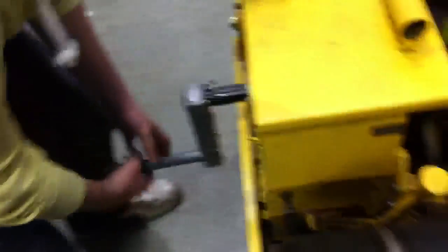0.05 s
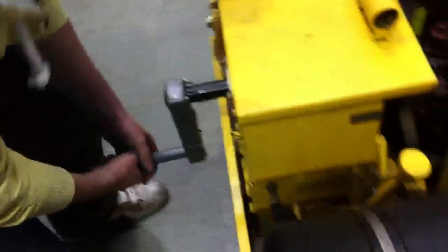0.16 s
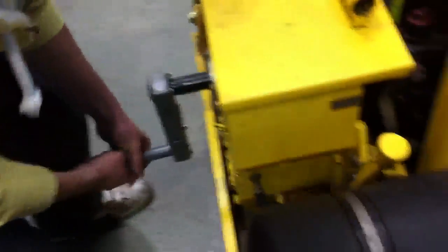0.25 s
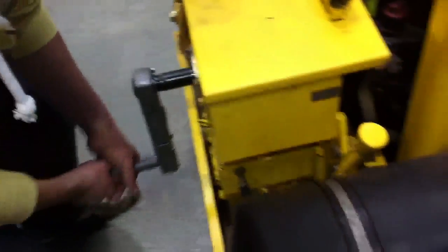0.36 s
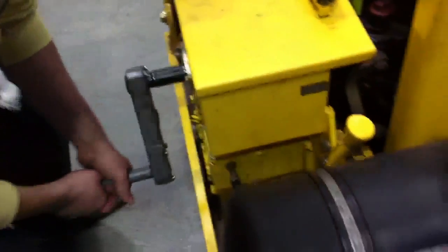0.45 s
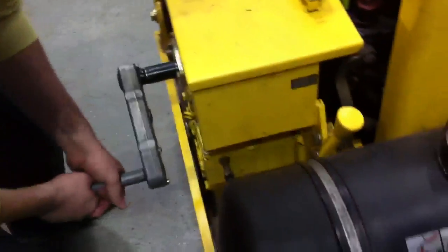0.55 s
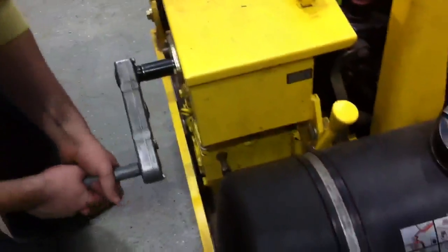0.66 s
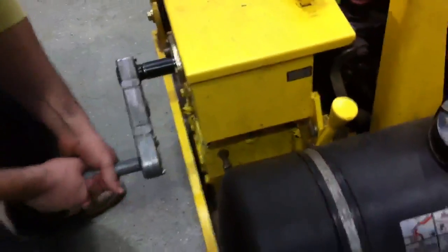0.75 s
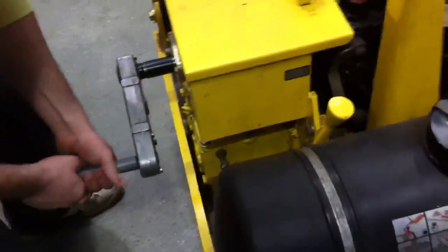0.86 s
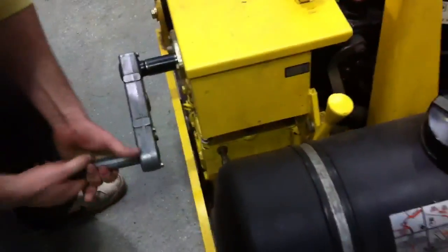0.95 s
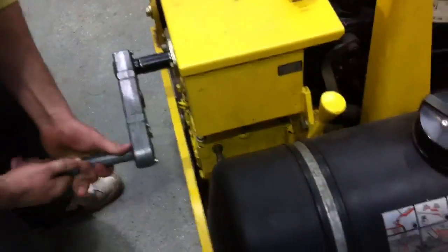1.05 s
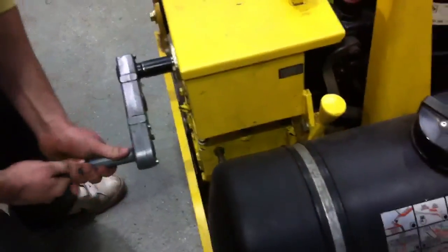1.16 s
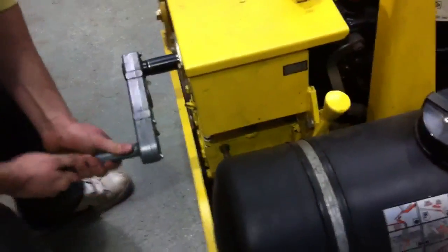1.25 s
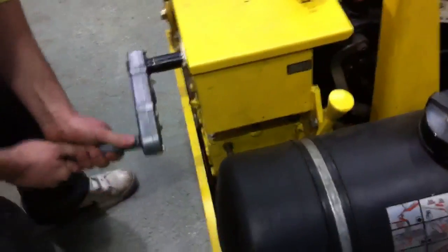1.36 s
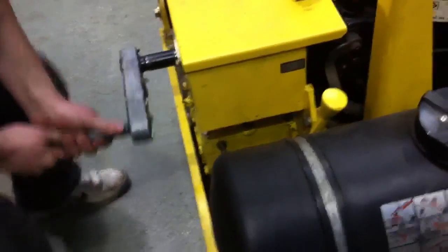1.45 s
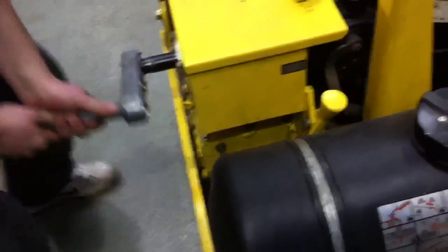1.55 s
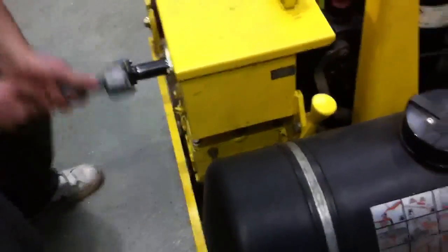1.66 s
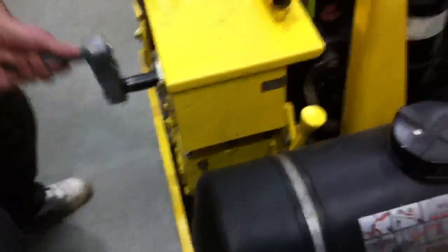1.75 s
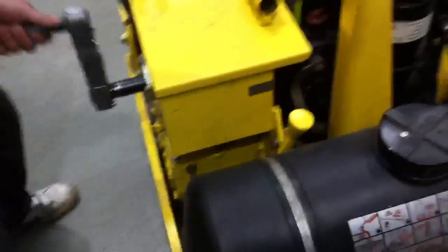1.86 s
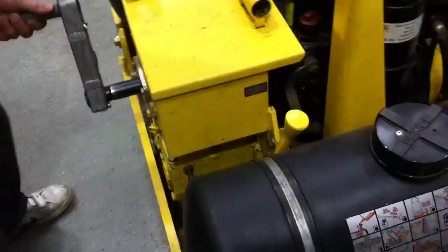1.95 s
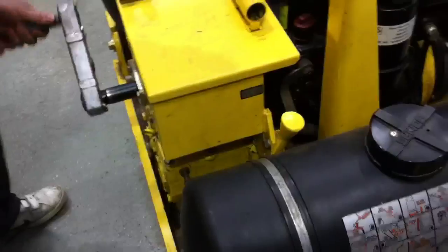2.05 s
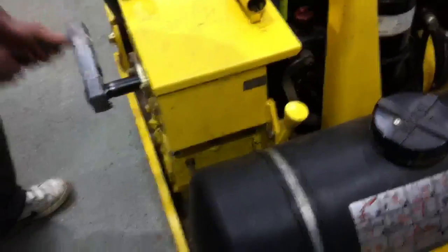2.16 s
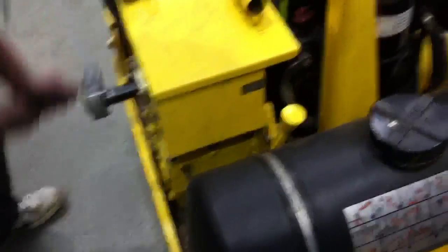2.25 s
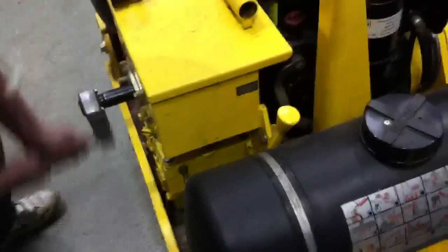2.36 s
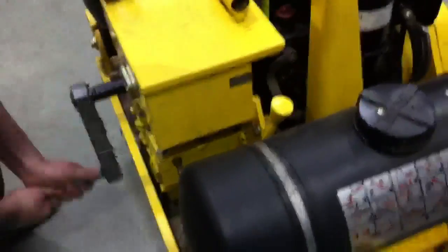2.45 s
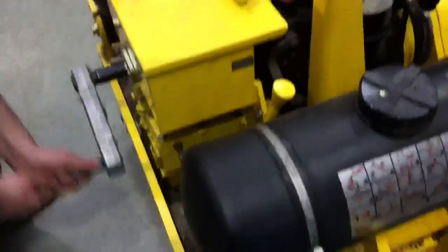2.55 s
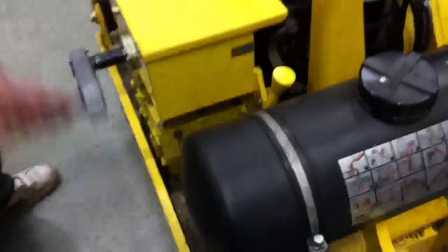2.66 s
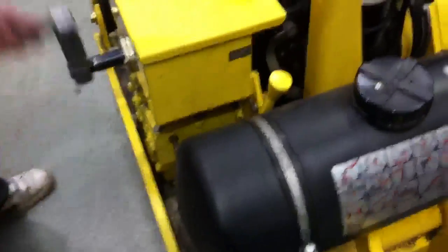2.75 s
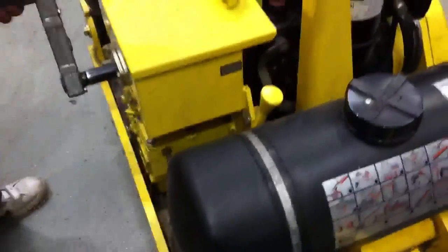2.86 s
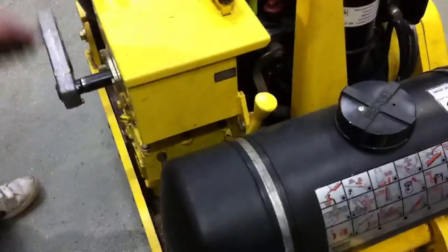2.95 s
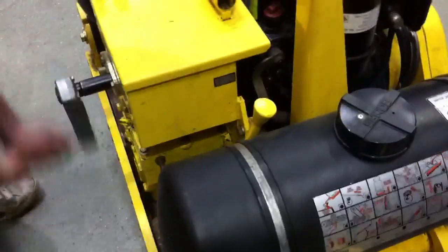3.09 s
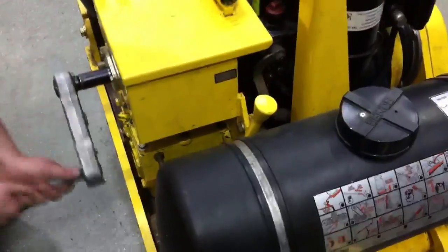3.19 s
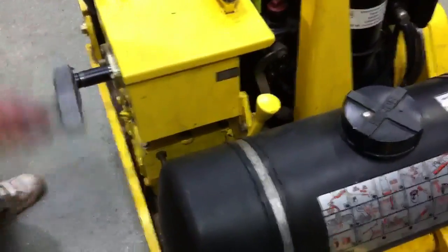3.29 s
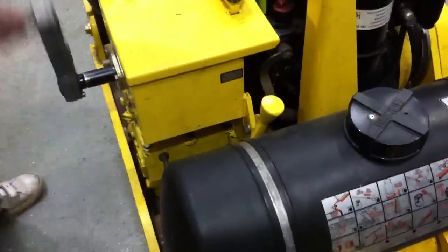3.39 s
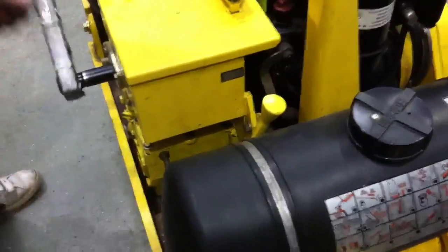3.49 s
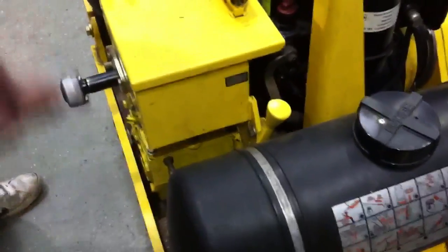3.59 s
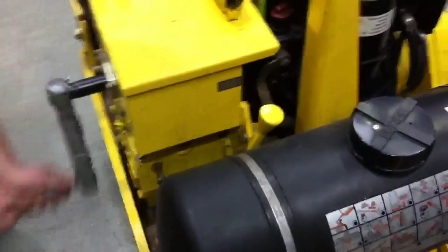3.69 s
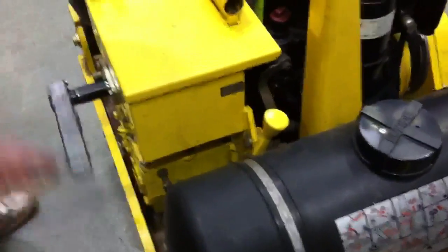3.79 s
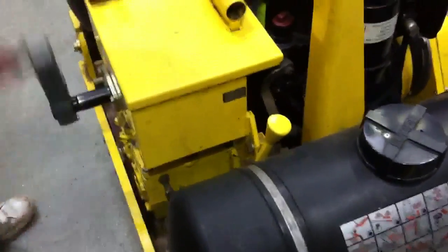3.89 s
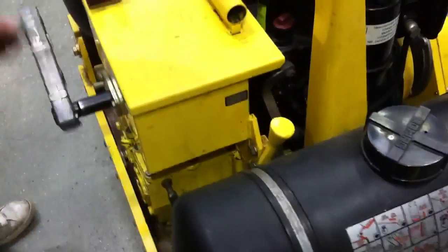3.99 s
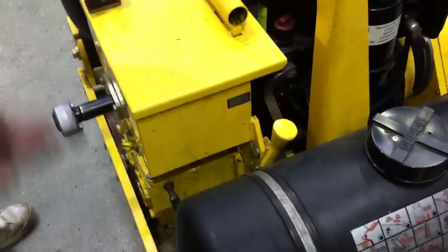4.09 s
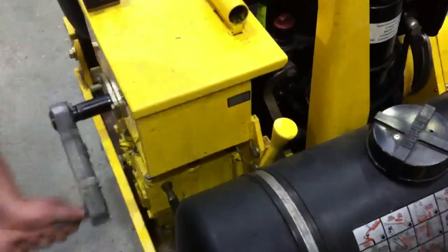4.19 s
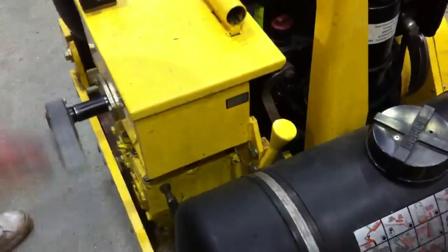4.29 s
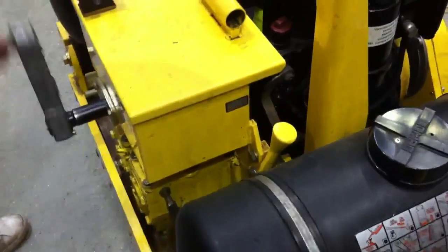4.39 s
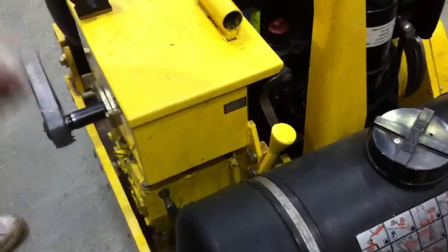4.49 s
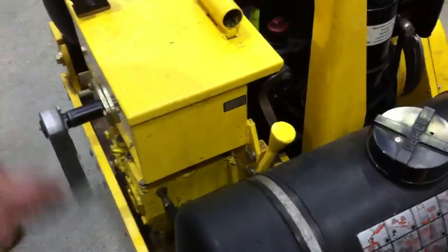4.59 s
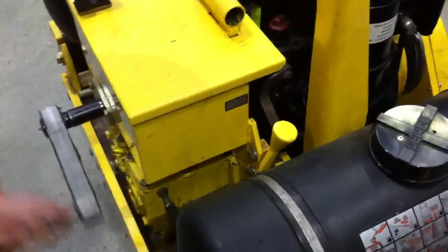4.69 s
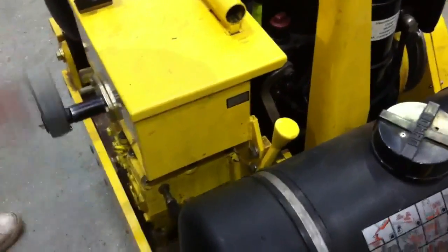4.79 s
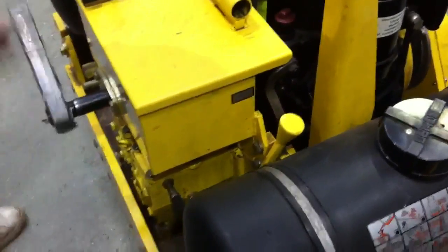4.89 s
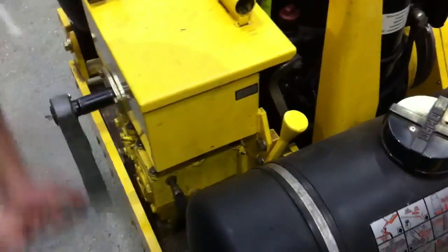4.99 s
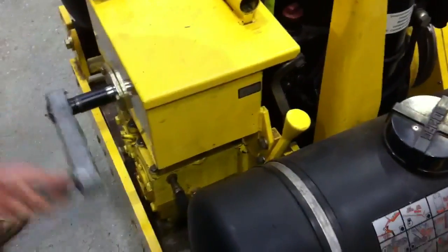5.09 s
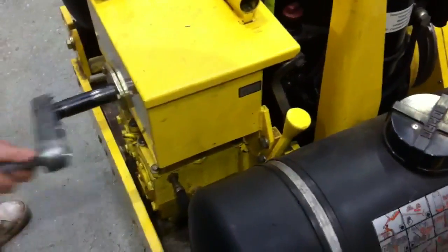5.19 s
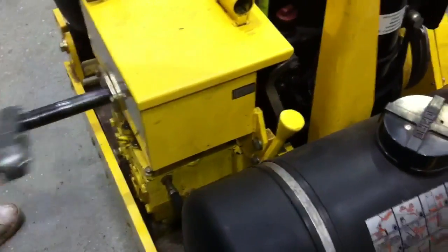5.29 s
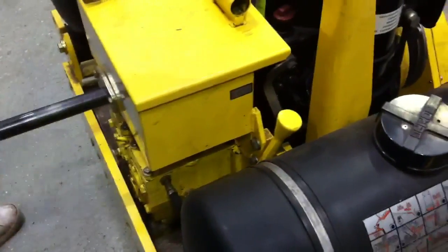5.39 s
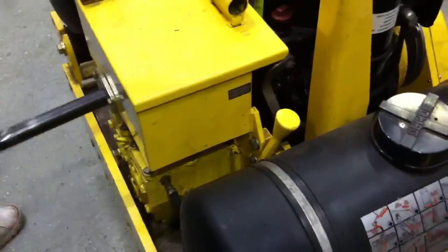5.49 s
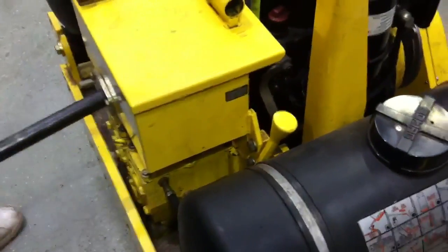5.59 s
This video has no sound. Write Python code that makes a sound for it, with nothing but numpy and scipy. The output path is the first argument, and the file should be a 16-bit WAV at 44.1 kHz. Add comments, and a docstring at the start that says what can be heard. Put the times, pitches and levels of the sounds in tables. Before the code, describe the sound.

A steel crank handle clunks into place, its ratchet clicks faster in surging turns, and a diesel engine coughs, catches and knocks at a quickening beat.

```python
"""In a workshop, close to the microphone, a single-cylinder diesel is started by hand.
The steel handle clunks into place; its ratchet then clicks faster and faster, surging with every fast turn.
Gears churn as shaped noise with rattling covers; clicks and knocks are noise bursts ringing steel modes.
The cylinder coughs, catches and knocks at a quickening beat, with low booms and hissing exhaust;
the handle is pulled off and the ratchet weakens and stops."""
import sys
import numpy as np
from scipy import signal
from scipy.io import wavfile
from scipy.ndimage import map_coordinates

SR = 44100
rng = np.random.default_rng(int(sys.argv[2]) if len(sys.argv) > 2 else 0)


def output_pcm(signal):
    """Save a mono or channel-first signal as 16-bit PCM at the path in sys.argv[1].

    Samples are clipped to [-1, 1] before scaling.
    """
    pcm = np.clip(np.atleast_2d(signal).T, -1, 1) * 32767
    wavfile.write(sys.argv[1], SR, np.round(pcm).astype(np.int16))


N = 248724
T = np.arange(N) / SR  # time in s


def amp(db):
    """Decibels to gain."""
    return 10 ** (np.asarray(db) / 20)


def unit(x):
    """Scales to rms 1."""
    return x / np.sqrt(np.mean(x ** 2) + 1e-20)


def curve(rows, t=T):
    """Joins (s, value) rows by straight lines."""
    return np.interp(t, *np.transpose(rows))


def read(points, hz):
    """Joins (Hz, value) rows on a log-frequency axis."""
    pitch_hz, value = np.transpose(points)
    return np.interp(np.log(hz + 1), np.log(pitch_hz + 1), value)


def add(mix, start_s, sound):
    """Mixes a sound in at its start time."""
    part = mix[max(round(start_s * SR), 0):][:len(sound)]
    part += sound[:len(part)]


def colour(x, spectrum, size=4096):
    """Causal (minimum-phase) filter of unit energy with the given spectrum shape."""
    hz = abs(np.fft.fftfreq(size, 1 / SR))
    log_gain = np.log(amp(np.maximum(read(spectrum, hz), -100)))
    taps = np.fft.ifft(np.exp(np.conj(signal.hilbert(log_gain)))).real
    return signal.oaconvolve(x, taps / np.linalg.norm(taps))[:N]


def ring(x, modes, sign=-1):
    """Drives dying modes of unit total energy; modes of like sign leave hollows between them."""
    t = T[:SR // 4]
    taps = np.zeros(len(t))
    for k, (hz, width, db) in enumerate(modes):
        decay = np.exp(-np.pi * width * t)  # a wider mode dies sooner
        tone = np.cos(2 * np.pi * hz * t + np.arctan(width / 2 / hz))
        taps += np.sign(sign) ** k * amp(db) * width * decay * tone
    return signal.oaconvolve(x, taps / np.linalg.norm(taps))[:N]


def burst(decay_s, size=10000):
    """A shower of tiny contacts that starts fast and dies away."""
    t = T[:size]
    return rng.standard_normal(size) * (1 - np.exp(-t / .0003)) * np.exp(-t / decay_s)


def bursts(rows):
    """One burst for each (start_s, level_db, decay_s) row."""
    out = np.zeros(N)
    for start_s, db, decay_s in rows:
        add(out, start_s, amp(db) * burst(decay_s))
    return out


def boom(db, decay_s, hz):
    """A hollow steel vessel swells and dies away on one low note."""
    t = T[:SR // 3]
    return amp(db) * (1 - np.exp(-t / .004)) * np.exp(-t / decay_s) * np.sin(2 * np.pi * hz * t)


# how long the workshop echoes: pitch_hz, t60_s
ROOM = [(200, 0.68), (1000, 0.34), (4000, 0.35), (15000, 0.25)]


def room(x, wet_db):
    """Adds the workshop's echo: scattered reflections, each band dying at its own speed."""
    t = T[:SR // 2]
    scatter = rng.standard_normal(SR // 2) * (t > .006)
    hz, frame_s, bands = signal.stft(scatter, SR, nperseg=256)
    fade = amp(-60 * frame_s / read(ROOM, hz)[:, None])
    tail = signal.istft(bands * fade, SR, nperseg=256)[1]
    return x + amp(wet_db) * signal.oaconvolve(x, tail / np.linalg.norm(tail))[:N]


# background spectrum: pitch_hz, level_db (per Hz, relative)
SHOP = [(25, -46), (80, -20.5), (130, -5.5), (200, 0.5), (350, -7.5), (650, -10.5), (1200, -15.5),
        (2000, -22.5), (4000, -27), (8000, -32.5), (16000, -33.5)]
# background level: start_s, level_db
SHOP_DB = [(0, -47.5), (.64, -49), (.95, -47), (1.55, -51.5)]
# hands and sleeves sliding on the grip: middle_s, half_length_s, level_db
SLIDES = [(0.054, 0.13, -54.5), (1.013, 0.049, -51.5), (1.32, 0.16, -57)]
# spectrum of sliding cloth: pitch_hz, level_db (relative)
CLOTH = [(1500, -1.5), (4000, 0.5), (7000, -3.5), (10000, -7.5), (16000, -11)]


def workshop():
    """Low background noise of the workshop, and cloth swelling and fading as the grip shifts."""
    air, cloth = rng.standard_normal((2, N))
    sliding = sum(amp(db) / (1 + ((T - middle_s) / half_s) ** 4) for middle_s, half_s, db in SLIDES)
    return amp(curve(SHOP_DB)) * colour(air, SHOP) + sliding * colour(cloth, CLOTH)


# deep rumble while the heavy first turns are forced round: pitch_hz, level_db (per Hz, relative)
HEAVE = [(20, -6), (45, -3), (100, -4), (200, -30), (1000, -70)]


def heave(start_s=1.7, end_s=2.93, level_db=-59.5):
    """A faint, deep rumble of filtered noise under the first turns."""
    noise = rng.standard_normal(N) * (T > start_s) * (T < end_s)
    return amp(level_db) * colour(noise, HEAVE)


# air drawn in on each intake stroke: middle_s
INTAKE = [1.99, 2.33, 2.59, 2.96, 3.28, 3.56, 3.8, 4.2]


def intake(half_s=0.048, level_db=-34.5):
    """Each intake stroke draws air through the hollow filter housing."""
    flow = amp(level_db) * sum(np.exp(-((T - middle_s) / half_s) ** 4) for middle_s in INTAKE)
    housing = [(300, -30.0), (620, 2), (800, 8), (950, 3), (1400, -24), (5000, -40)]
    return colour(flow * rng.standard_normal(N), housing)


# gears and bearings turning: start_s, level_db (of the drive to churn and rattle)
CHURN = [(1.595, -43), (1.9, -40.5), (2.74, -35), (2.82, -24.5), (2.92, -31.5), (4.85, -29), (5.3, -24.5),
         (5.64, -19)]
# spectrum of the churning: pitch_hz, level_db (relative)
GEARS = [(30, -46), (80, -18.5), (150, -14), (230, 3.5), (330, -3.5), (700, 1.5), (1300, -7), (2300, -8.5),
         (4200, -12), (9000, -43)]
# ring of the engine block and its covers, also used by the knocks: pitch_hz, width_hz, level_db (relative)
BLOCK = [(144.3, 16.5, -7), (232.7, 19, 7), (357.5, 71, -2.5), (486, 64, -7), (585, 53, 0), (662, 34, 0),
         (758, 64, -2.5), (885.6, 36, 1.5), (1050, 24, 1.5), (1300, 29, -5), (1637, 104, -6),
         (1930, 31, -4), (2277, 190, -5.5)]


def gears(level_db=-1, rattle_db=-5, rattles_per_s=130, grain_db=4):
    """Gear teeth and bearings churn as noise; loose covers rattle at random on the block."""
    hits = rng.random(N) < rattles_per_s / SR
    strength = amp(grain_db * np.minimum(rng.exponential(1, N), 2))
    grains = hits * strength * rng.choice([-1, 1], N)
    drive = amp(curve(CHURN)) * (T > CHURN[0][0])
    churn = colour(drive * rng.standard_normal(N), GEARS)
    rattle = ring(drive * unit(grains), BLOCK)
    return room(amp(level_db) * churn + amp(rattle_db) * rattle, wet_db=-8.5)


# the handle seats on its shaft: start_s, level_db (of the blow), decay_s, boom_db (of the hollow housing)
CLUNKS = [(.128, -43, .016, -34), (.301, -35.5, 0.0076, -36), (.6795, -24, 0.0068, -28.5),
          (0.827, -37.5, 0.022, -53), (0.852, -35, 0.021, -24.5)]
# ring of the handle in its socket: pitch_hz, width_hz, level_db (relative)
SOCKET = [(245, 43, -4), (425, 65, -3), (590, 99, 2), (748, 59, 6.5), (884, 93, 2), (1330, 100, -0.5),
          (1610, 160, -11), (2490, 65, -9)]
# spectrum of a bare blow, also used by the knocks: pitch_hz, level_db (relative)
CRACK = [(50, -54), (100, -28), (240, -4.5), (700, -9), (1400, 0), (2500, -7), (5000, -10), (10000, -40),
         (16000, -30)]


def clunks(ring_db=0, bare_db=-14, shiver_db=-19.0, shiver_s=0.11, boom_s=0.028, housing_hz=240):
    """The handle knocks in its socket and shivers on, the housing booms, and the workshop answers."""
    blows, booms = np.zeros(N), np.zeros(N)
    for start_s, db, decay_s, boom_db in CLUNKS:
        blow = burst(decay_s) + amp(shiver_db) * burst(shiver_s)
        add(blows, start_s, amp(db) * blow)
        add(booms, start_s, boom(boom_db, boom_s, housing_hz))
    handle = amp(ring_db) * ring(blows, SOCKET) + amp(bare_db) * colour(blows, CRACK)
    return room(handle, wet_db=-9.0) + room(booms, wet_db=-13)


# pace of the ratchet before the surges, until the handle comes off: start_s, teeth_per_s
PACE = [(1.62, 17.26), (1.892, 30.34), (1.904, 35.19), (2.138, 43.61), (2.364, 39.06), (2.4, 43.45),
        (2.606, 47.19), (2.775, 52.92), (2.908, 83.18), (3.027, 82.78), (3.134, 71.64), (5.28, 109.19)]
# fast turns, each swung by the arm: start_s, length_s, share of speed gained at the top of the swing
SWINGS = [(3.16, 0.567, 0.522), (3.727, 0.512, 0.589), (4.239, 0.438, 0.585), (4.677, 0.466, 0.959)]
# every swing drags, then surges: share of the turn, share of the surge
SURGE = [(0.0, 0.0), (0.088, -0.331), (0.475, -0.014), (0.682, 1.0), (0.832, 0.438), (1.0, 0.0)]


def tooth_speed():
    """Teeth per second: the pace of the cranking, with a surge in every fast turn."""
    surge = sum(share * curve(SURGE, (T - start_s) / length_s) for start_s, length_s, share in SWINGS)
    return np.interp(T, *np.transpose(PACE), left=0, right=0) * (1 + surge)


WHEEL_TEETH = 47
# tight places where the pawl snaps harder once a turn: tooth, build_up_teeth, extra_db
TIGHT = [(18.3, 5.5, 10), (40, 5.2, 9)]
PAWL_DB = -22  # before tight places, slow teeth and slipping
RELEASE_TEETH = 1.9  # past a tight place the pawl eases over about this many teeth
SOFT_BELOW_TEETH_PER_S, SOFT_DB = 37, -24  # a slowly turned wheel lets the pawl down more gently
SLIP_S, SLIP_DB_PER_S = 4.63, 37  # the pawl weakens as the handle is drawn off


def pawl_db(tooth, speed, s):
    """How hard the pawl snaps: it builds towards each tight place, weaker when slow or slipping off."""
    softness = np.maximum(1 - speed / SOFT_BELOW_TEETH_PER_S, 0)
    level = PAWL_DB + SOFT_DB * softness - SLIP_DB_PER_S * np.maximum(s - SLIP_S, 0)
    for at, build_up, db in TIGHT:
        past = (tooth - at + WHEEL_TEETH / 2) % WHEEL_TEETH - WHEEL_TEETH / 2
        level = level + db * np.exp(-(past / np.where(past < 0, build_up, RELEASE_TEETH)) ** 2)
    return level


def cover_echo(x, turns, delay_ms=0.594, swing=0.091, strength=0.16):
    """The steel cover by the handle reflects it; the path swings each turn, so the ring's hollows drift."""
    delay_s = delay_ms / 1000 * (1 + swing * np.sin(2 * np.pi * turns))
    echo = map_coordinates(x, [np.arange(N) - delay_s * SR], order=3)
    return (x + strength * echo) / np.hypot(1, strength)


# ring of the steel handle: pitch_hz, width_hz, level_db (relative)
STEEL = [(1703, 190, 0.5), (2335, 53, 5.5), (3327, 326, 5.5), (4820, 420, -1.5), (6180, 116, 1.5),
         (6940, 730, 1.5), (8210, 780, 1.5), (10060, 1080, 1.5), (11550, 490, 1.5), (12700, 3000, -7),
         (14700, 520, -35)]
# the loose handle clatters on its shaft: start_s, level_db
CLATTER = [(1.632, -30.5), (2.041, -26), (3.152, -24), (3.297, -24), (3.572, -24), (3.714, -23.5),
           (3.841, -22.5), (3.967, -20), (4.09, -24), (4.22, -24), (4.445, -24)]
CLATTER_S = 0.016  # decay of each clatter


def ratchet(snap_db=5, chatter_db=-20, bare_db=-9, scatter_db=1.7, snap_s=0.0024, chatter_s=0.0085,
            slow_chatter_db=2, fast_gain_db=-0.48):
    """The pawl drops off each tooth: a bright snap, then a chatter; both ring the steel handle."""
    speeds = tooth_speed()
    teeth = np.cumsum(speeds) / SR
    drops = np.flatnonzero(np.diff(np.floor(teeth + .5)))
    levels = pawl_db(teeth[drops], speeds[drops], T[drops])
    chances = rng.standard_normal(len(drops))
    snaps, chatter, t = np.zeros(N), np.zeros(N), T[:SR // 50]
    shape = (1 - np.exp(-t / 0.0011)) * np.exp(-(t / snap_s) ** 2)
    for start_s, db, speed, chance in zip(T[drops], levels, speeds[drops], chances):
        slow = min(25 / speed, 1) ** 2  # on slow teeth the pawl snaps less and has time to bounce
        drop_db = db + scatter_db * chance - 3.8 * slow
        add(snaps, start_s, amp(drop_db) * shape * rng.choice([-1, 1], len(t)))
        # fast_gain_db is the change for every 75 teeth per s
        bounce_db = chatter_db + slow_chatter_db * slow + fast_gain_db * speed / 75
        add(chatter, start_s, amp(bounce_db) * burst(chatter_s, size=2000))
    bright = [(300, -57), (1500, -20), (5000, -18), (7500, -7.0), (11500, -1), (16000, 1.5)]
    snaps = amp(snap_db) * colour(snaps, bright)
    chatter = colour(chatter, [(100, -53), (1300, -2.5), (8000, 1.5), (16000, 1.0)])
    clatter = bursts([(start_s, db, CLATTER_S) for start_s, db in CLATTER])
    clatter = colour(clatter, [(200, -15), (1200, 2.5), (3000, 0.5), (6000, -2.5), (16000, -27)])
    # the snap rings the handle, with a bare share straight from the pawl; the chatter rings the handle too;
    # both echo in the room alike
    near = room(ring(snaps, STEEL, sign=1) + amp(bare_db) * snaps, wet_db=-8)
    spread = room(ring(chatter, STEEL, sign=1) + clatter, wet_db=-8.5)
    return cover_echo(near + spread, teeth / WHEEL_TEETH)


# coughs while the engine is catching, some in two blows, and a hollow gulp of intake air at 5.171 s;
# also used by the knocks: start_s, knock_db, boom_db, hiss_db
COUGHS = [(2.356, -46, -31, -43), (2.802, -16, -4, -21), (2.831, -19, -15, -19), (3.437, -19, -24, -20),
          (4.037, -32, -17.5, -42), (4.699, -17.5, -11.5, -10), (4.899, -12.5, -4, -10),
          (4.926, -10, -21, -14), (5.171, -20, -12.5, -36)]
# the engine fires at a quickening beat, also used by the knocks:
# start_s, knock_db, clank_db (of the ignition), exhaust_db, boom_db
FIRINGS = [(5.072, -11.5, -14, -35, -44), (5.213, -12.5, -4, -22.5, -12), (5.331, -10.5, -5, -16, -9.5),
           (5.437, -9, -28, -14, -18), (5.530, -11, -13, -14.5, -10.5), (5.619, -12, -12, -25, -18)]
COUGH_KNOCK_S, COUGH_HISS_S, COUGH_BOOM_S = 0.023, 0.0081, 0.023  # decays
FIRING_KNOCK_S, FIRING_HISS_S, FIRING_BOOM_S = 0.011, 0.014, 0.027  # decays
VALVE_LAG_S = .021  # the exhaust valve opens this long after the ignition
BOOM_LAG_S = 0.0084  # the silencer answers a firing this much later
# each exhaust stroke thumps in the pipe: pitch, level against the exhaust, decay
THUMP_HZ, THUMP_DB, THUMP_S = 155.6, -6, 0.045


def exhaust(rough=0.09, steady_hiss_db=-28, cold_hz=253, hot_hz=234):
    """Gas booms in the silencer and hisses from the pipe, steadily once the engine runs; one gulp of intake."""
    booms, puffs = np.zeros(N), []
    for start_s, _, boom_db, hiss_db in COUGHS:
        add(booms, start_s, boom(boom_db, COUGH_BOOM_S, cold_hz))
        puffs.append((start_s, hiss_db, COUGH_HISS_S))
    for start_s, _, _, db, boom_db in FIRINGS:  # the boom sits a little lower once the engine has caught
        add(booms, start_s + BOOM_LAG_S, boom(boom_db, FIRING_BOOM_S, hot_hz))
        add(booms, start_s + VALVE_LAG_S, boom(db + THUMP_DB, THUMP_S, THUMP_HZ))
        puffs.append((start_s + VALVE_LAG_S, db, FIRING_HISS_S))
    flutter = unit(colour(rng.standard_normal(N), [(120, 5), (400, -50.0), (2000, 2)]))
    fade_in = np.clip((T - 4.9) / 0.55, 0, 1)
    hiss = bursts(puffs) + amp(steady_hiss_db) * fade_in * rng.standard_normal(N)
    hiss = colour(hiss, [(500, -21), (3000, -8.5), (7500, -5), (16000, -9.5)])
    return room(booms * (1 + rough * flutter), wet_db=-10.5) + room(hiss, wet_db=-5.5)


# the drive takes up its slack: start_s, level_db
THUDS = [(1.776, -28), (2.236, -23.5)]
THUD_S = .0045  # decay
# ring of the cylinder: pitch_hz, width_hz, level_db (relative)
CYLINDER = [(680, 100, -1), (2740, 150, -4.5), (3200, 170, -3)]
# a thin cover keeps singing after a cough: pitch_hz, level_db (before the decay), decay_s
SING = [(1039, -20, 0.08), (1152, -23.5, 0.056)]
SING_S = 4.955  # start of the singing
SHAKE_DB, SHAKE_S = -0.5, 0.042  # the exhaust stroke shakes the block: level against the exhaust, decay


def knocks(ring_db=-1, bare_db=-5, ignition_s=0.0053):
    """Each blow cracks and sets the block ringing; hard ignitions add the diesel clank."""
    blows = [(start_s, db, THUD_S) for start_s, db in THUDS]
    blows += [(start_s, db, COUGH_KNOCK_S) for start_s, db, _, _ in COUGHS]
    for start_s, knock_db, _, exhaust_db, _ in FIRINGS:
        blows.append((start_s, knock_db, FIRING_KNOCK_S))
        blows.append((start_s + VALVE_LAG_S, exhaust_db + SHAKE_DB, SHAKE_S))
    # ring and crack draw their own noise
    body = amp(ring_db) * ring(bursts(blows), BLOCK) + amp(bare_db) * colour(bursts(blows), CRACK)
    ignitions = bursts([(start_s, db, ignition_s) for start_s, _, db, _, _ in FIRINGS])
    clank = ring(ignitions, CYLINDER)
    for hz, db, decay_s in SING:
        add(body, SING_S, amp(db) * np.exp(-T / decay_s) * np.sin(2 * np.pi * hz * T))
    return room(body, wet_db=-7.5) + room(clank, wet_db=-7.5)


def scene():
    """All sources at one close microphone."""
    background = workshop() + heave()
    cranking = intake() + gears() + clunks() + ratchet()
    engine = exhaust() + knocks()
    return (background + cranking + engine)[None]


CEILING = .98  # pressure that the rounding of peaks approaches (full scale = 1)
EDGE_HZ = 15850  # upper band limit


def record(dry):
    """The microphone rounds the peaks; then a low-pass filter limits the band."""
    soft = dry / (1 + (dry / CEILING) ** 4) ** .25
    low_pass = signal.firwin(401, EDGE_HZ, window=("kaiser", 8), fs=SR)
    return signal.oaconvolve(soft, low_pass[None], "same")


dry = scene()
out = record(dry)
output_pcm(out)
```